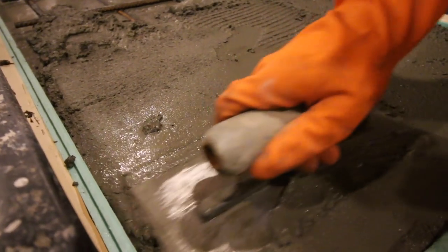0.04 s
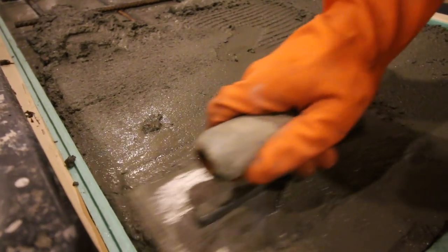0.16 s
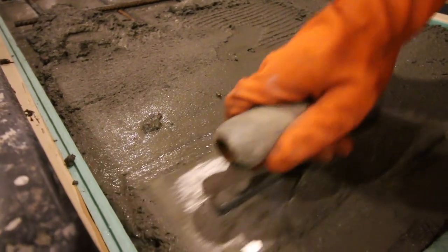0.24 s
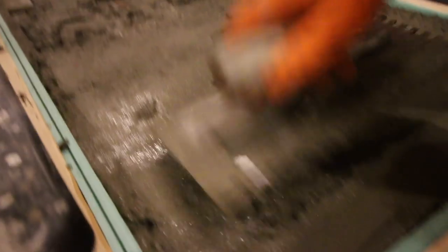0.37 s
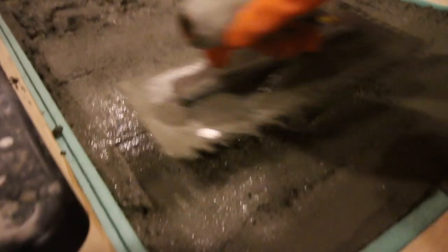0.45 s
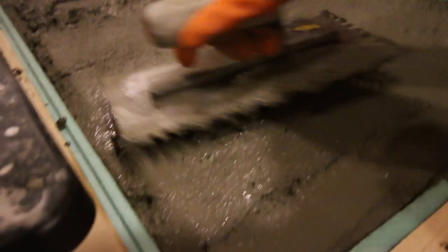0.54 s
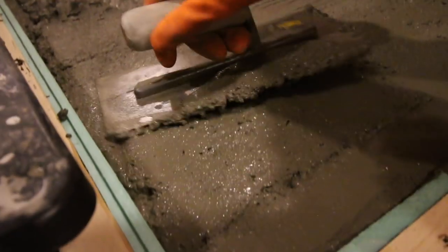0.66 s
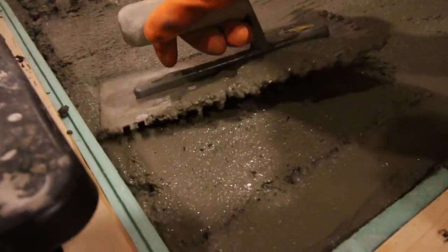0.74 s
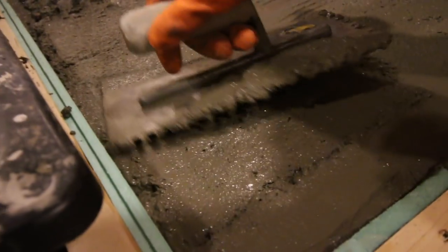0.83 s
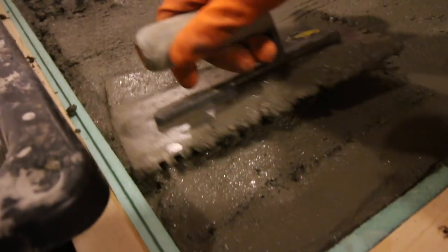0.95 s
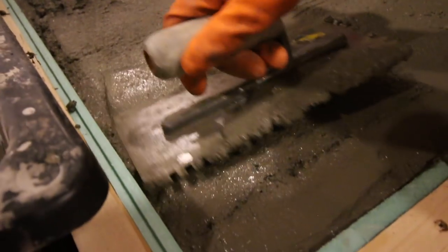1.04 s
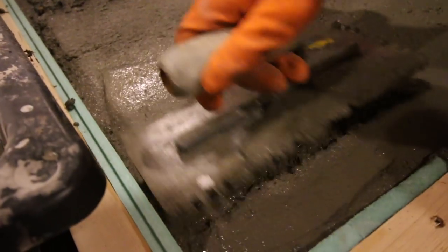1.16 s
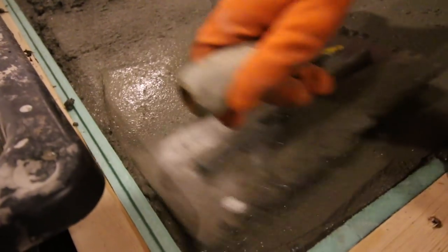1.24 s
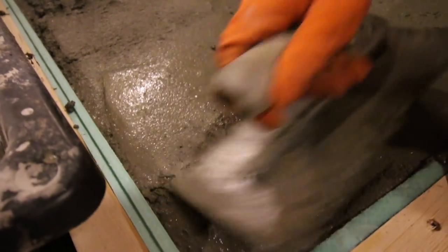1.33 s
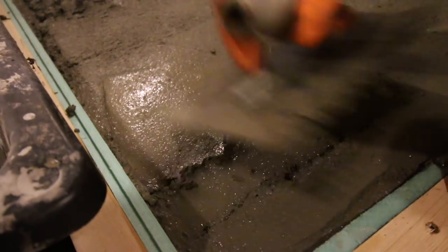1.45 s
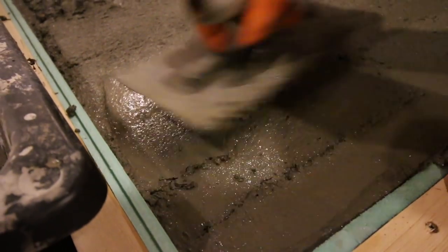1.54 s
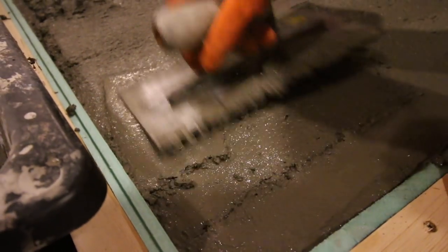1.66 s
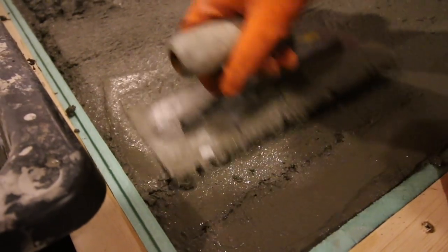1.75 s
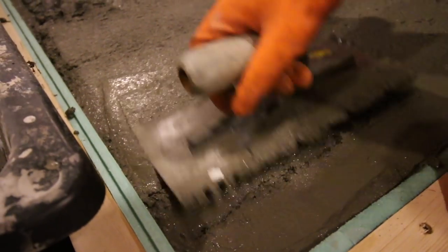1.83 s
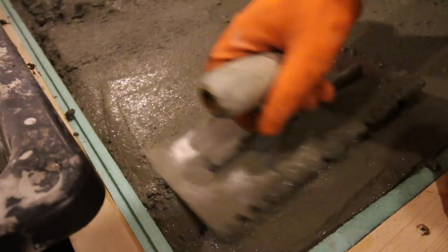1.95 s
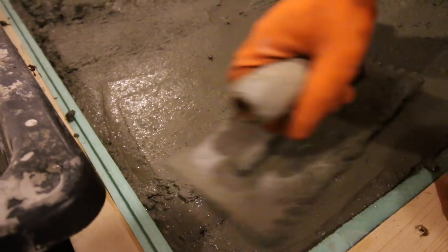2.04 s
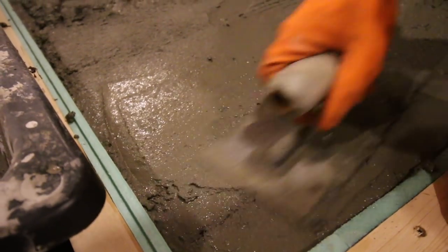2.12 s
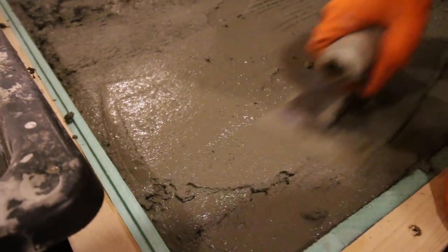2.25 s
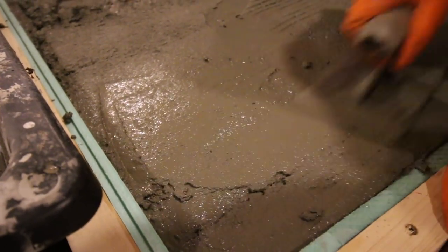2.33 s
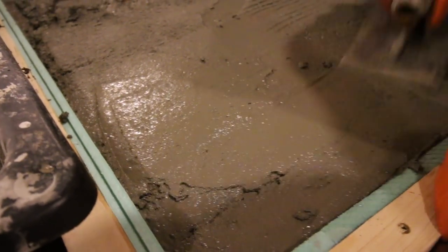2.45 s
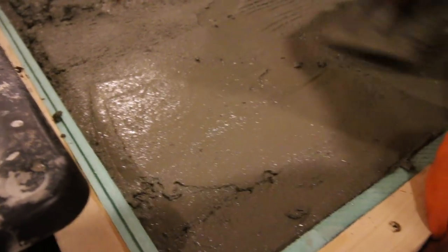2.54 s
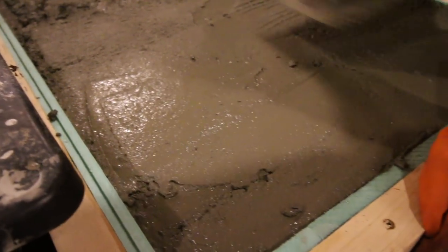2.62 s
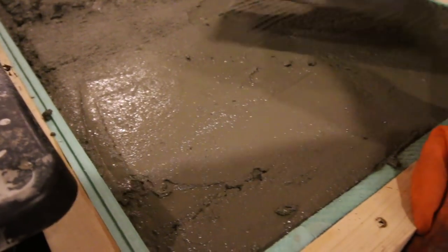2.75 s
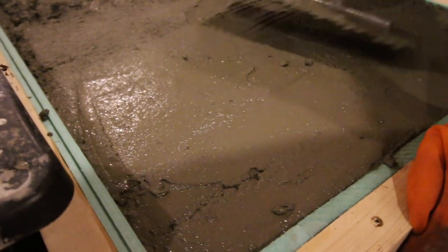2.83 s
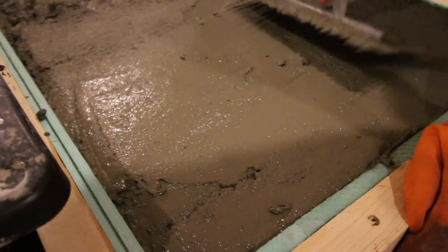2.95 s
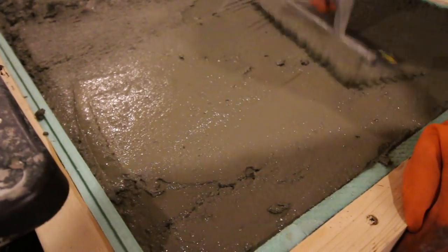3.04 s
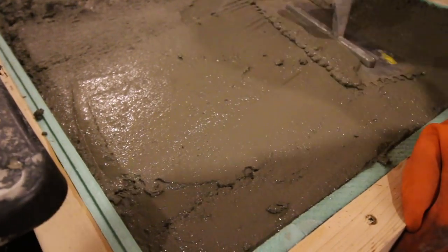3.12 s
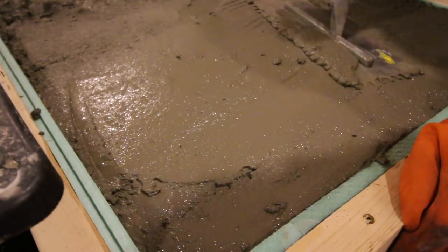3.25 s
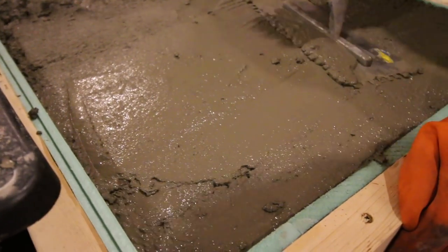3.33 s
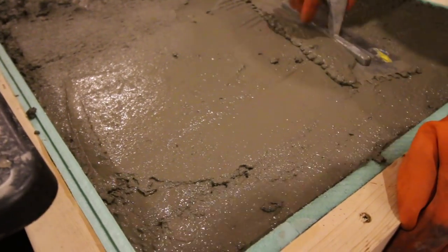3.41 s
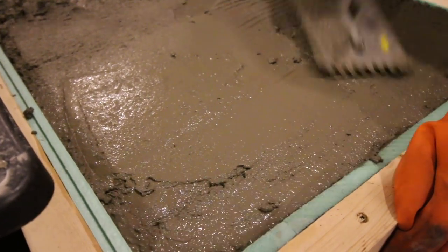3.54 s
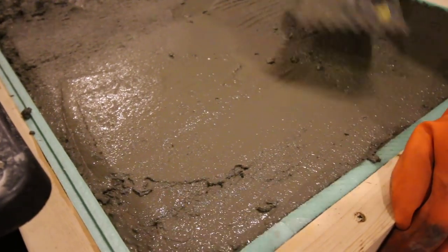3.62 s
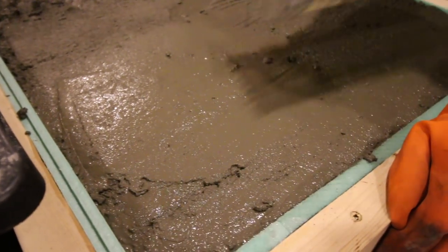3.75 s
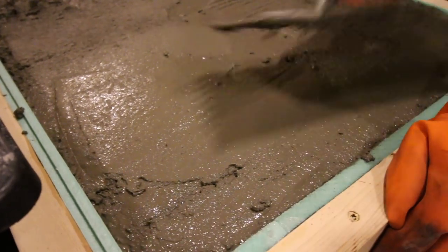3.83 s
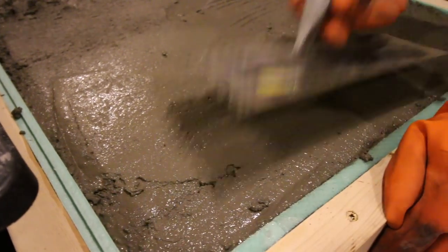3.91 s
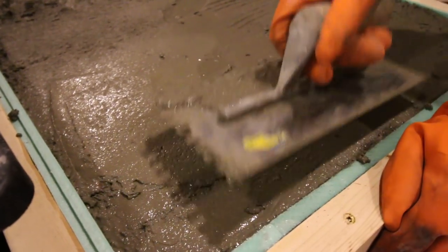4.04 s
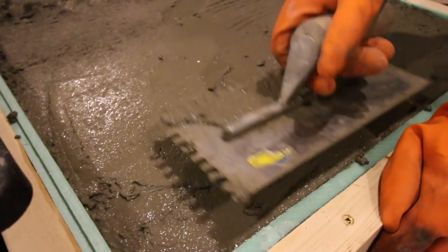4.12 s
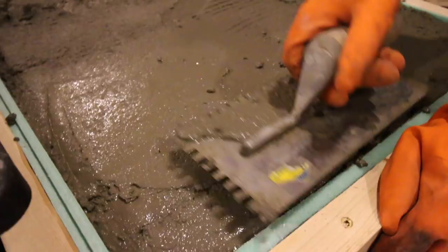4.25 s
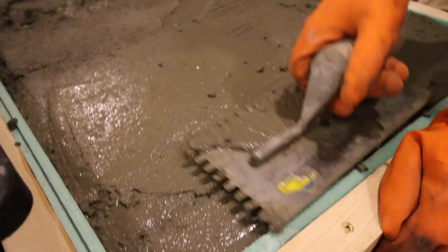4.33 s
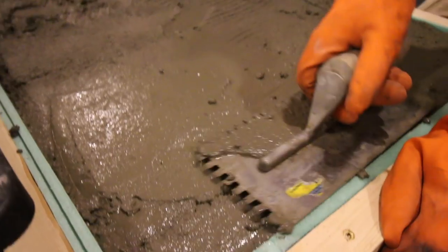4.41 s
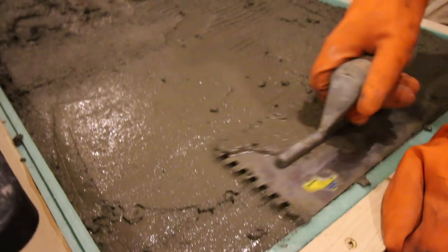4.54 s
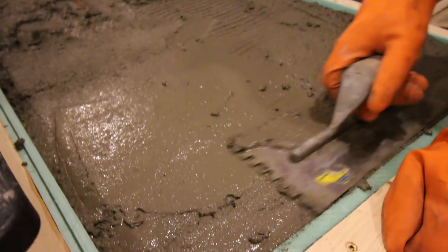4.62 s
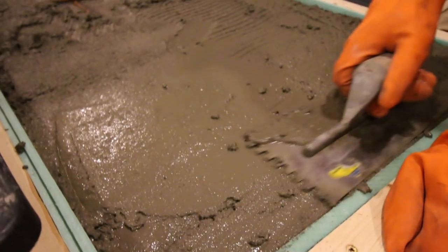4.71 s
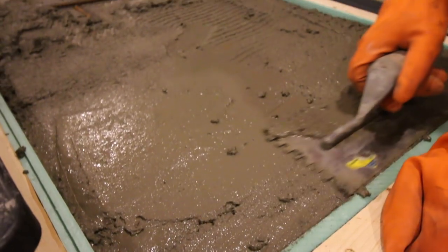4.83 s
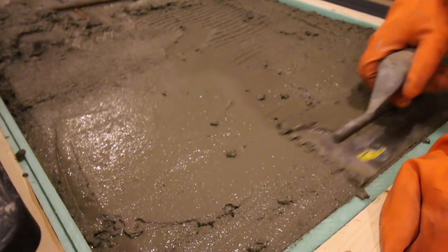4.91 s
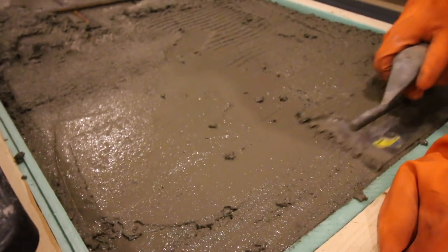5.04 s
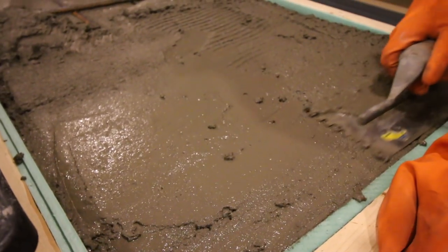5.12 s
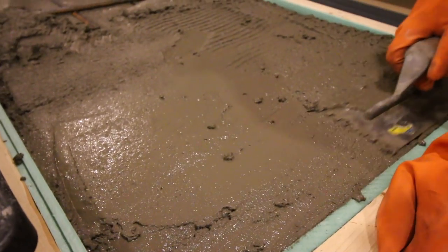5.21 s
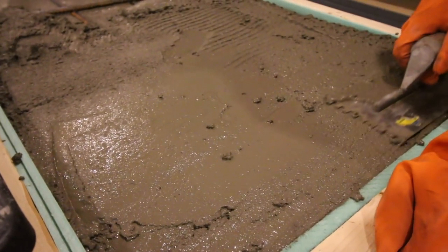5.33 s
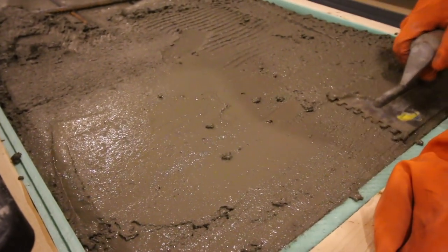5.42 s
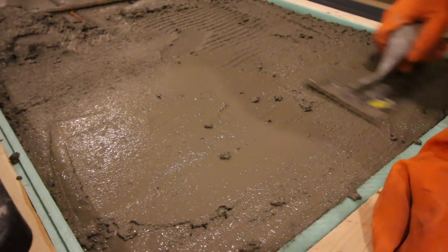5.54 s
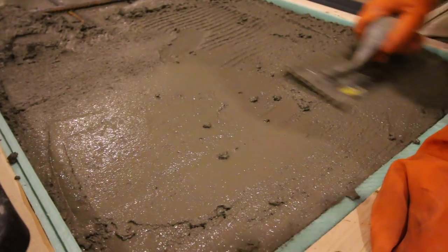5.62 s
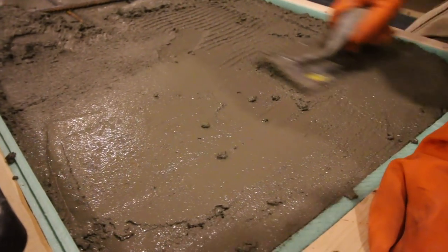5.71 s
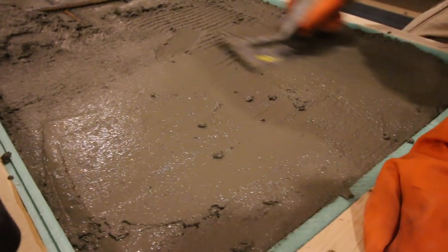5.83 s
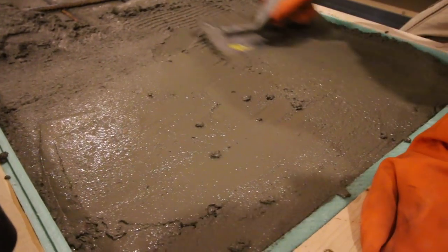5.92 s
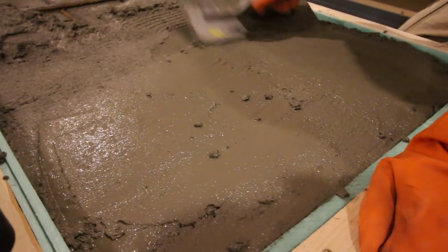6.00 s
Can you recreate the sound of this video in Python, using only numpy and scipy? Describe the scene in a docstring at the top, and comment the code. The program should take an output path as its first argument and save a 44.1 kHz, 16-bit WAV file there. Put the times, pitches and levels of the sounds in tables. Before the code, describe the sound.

Close gritty scraping of a notched trowel on wet concrete: short shoves, sharp stone clicks, quiet pauses, then a loud final sweep.

```python
"""Beside nearby walls, a notched steel trowel works wet concrete in a wooden form, close to the listener.
Short shoves and long sweeps are random sand grains, filtered into a rasp, a wet hiss, a rumble of the form
and a ring of the steel. Resonances add squeaks and low ringing, bursts of noise make clicks, and fading
tones make thuds. Dense echoes answer from the walls, over a low electric hum and a faint rush."""
import sys
import numpy as np
from scipy import signal
from scipy.fft import rfft, irfft
from scipy.io import wavfile
from scipy.ndimage import uniform_filter1d

SR = 44100
rng = np.random.default_rng(int(sys.argv[2]) if len(sys.argv) > 2 else 0)


def file_out(sig):
    """Save sig as 16-bit WAV at sys.argv[1]."""
    # one column per channel
    cols = np.atleast_2d(sig).T
    # limit, then scale
    lim = np.clip(cols, -1, 1)
    pcm = np.round(lim * 32767).astype(np.int16)
    wavfile.write(sys.argv[1], SR, pcm)


N = 267685
TIME = np.arange(N) / SR  # seconds

# spectrum of sand rasping under the blade: (f/Hz, level/dB)
RASP_SPECTRUM = [(50, -64.5), (150, -35.5), (600, -14), (1100, -7), (1750, -1.5), (2250, 2), (2900, 1.5),
                 (3600, 1.5), (4500, -2.5), (6000, -11), (9000, -25), (16000, -48.5)]
# spectrum of the hissing wet film: (f/Hz, level/dB)
HISS_SPECTRUM = [(1000, -48.5), (4000, -2.5), (5200, 3.5), (6300, 0.5), (7700, 4), (9400, 1.5),
                 (11500, -3.5), (15500, -6.5)]
# spectrum of the rumbling wooden form: (f/Hz, level/dB)
FORM_SPECTRUM = [(70, -46), (120, -21.5), (175, 3), (250, -10), (345, 6), (450, -7), (570, -0.5), (740, 7),
                 (900, 0), (1300, -6), (3000, -37)]
# resonances of the steel blade before bending; the widths hold in the mud: (f/Hz, width/Hz, level/dB)
BLADE_MODES = [(1128, 38, 1), (1430, 120, -8), (1581, 89, -0.5), (2074, 41, -2), (2590, 69, -3.5),
               (2940, 22, -21.5), (3480, 47, -32.5), (4300, 330, -13)]

USUAL_DB = -33.5  # rasp level at ordinary hand pressure
BEND = 0.96  # factor on the blade's pitches at ordinary pressure or less
SWEEP_GRIT_DB, SHOVE_GRIT_DB = 2, 4.5  # spread of grain sizes: sweeps ride on fines, shoves dig into coarse grit


def amp(db):
    """Turns decibels into gain."""
    return 10 ** (np.asarray(db) / 20)


def unit(x):
    """Scales a sound to rms 1."""
    return x / np.sqrt(np.mean(x ** 2) + 1e-20)


def read(points, hz):
    """Reads a curve between its points on a log-frequency axis."""
    f, value = np.transpose(points)
    return np.interp(np.log(hz + 1), np.log(f + 1), value)


def add(mix, s, sound):
    """Mixes a sound in at time s in seconds."""
    part = mix[..., max(round(s * SR), 0):][..., :sound.shape[-1]]
    part += sound[..., :part.shape[-1]]


def through(x, response):
    """Passes each row of x through an impulse response."""
    return signal.oaconvolve(x, np.atleast_2d(response), axes=1)[:, :x.shape[1]]


def colour(points, size=4096):
    """Makes a causal filter response of energy 1 with the given spectrum."""
    log_gain = np.log(amp(read(points, abs(np.fft.fftfreq(size, 1 / SR)))))
    minimum_phase = np.exp(np.conj(signal.hilbert(log_gain)))
    response = np.fft.ifft(minimum_phase).real[:size // 2]
    return response / np.linalg.norm(response)


def wander(rate_hz):
    """Makes a slow random curve of rms 1."""
    hz = np.fft.rfftfreq(N, 1 / SR)
    return unit(irfft(rfft(rng.standard_normal(N)) / (1 + (hz / rate_hz) ** 2), N))


def resonate(x, hz, width_hz):
    """A resonance of gain 1 that follows the pitch curve hz and passes no bass."""
    turn = np.exp(2j * np.pi * np.cumsum(hz) / SR)
    r = np.exp(-np.pi * width_hz / SR)
    # shift the pitch down to zero, smooth there, then shift back up
    return (turn * signal.lfilter([1 - r, 1 - r], [1, -r], x / turn)).real


def steady(x):
    """Holds the short-time power of the first row at 1; the other row gets the same gain."""
    return x / np.sqrt(abs(uniform_filter1d(x[0] ** 2, size=800)) + 1e-9)


def scrape():
    """Grains slip under the blade in uneven surges and drive the sand, the water film, the form and the steel."""
    # long smoothing sweeps: (form rumble re rasp level/dB, steel ring re rasp level/dB, hiss centre f/Hz,
    #                         curve of (t/s, rasp level/dB, hiss re rasp level/dB))
    sweep_strokes = [(-12.5, -8, 9800, [(0.775, -48, -4), (0.813, -37.5, -5.5), (0.953, -35, -5),
                     (1.037, -32, -7), (1.069, -35, -5.5), (1.301, -35.5, -7), (1.37, -30.5, -6)]),
                     (-14, -10, 9800, [(1.77, -33, -1.5), (1.808, -41, -1), (1.824, -34, -2),
                     (2.022, -36.5, -8), (2.05, -37, -4.5)]), (-9.5, -2.5, 8600, [(2.06, -32, -10),
                     (2.106, -31.5, -10), (2.144, -32.5, -11), (2.354, -29.5, -6), (2.378, -30, -5.5),
                     (2.504, -30, -4), (2.536, -35, 0), (2.62, -53.5, -7.5)]),
                     (-11, -10.5, 13000, [(4.48, -43, -11), (4.52, -56, 3), (4.536, -56.5, 6),
                     (4.672, -32.5, -5), (4.702, -35, -4), (4.906, -38.5, -8), (5.104, -33, -5),
                     (5.268, -36, -8), (5.51, -40, -4)]), (-16.5, -10, 9800, [(5.52, -36.5, -7.5),
                     (5.77, -22.5, -8), (5.8, -25, -5), (5.908, -23, -9), (5.948, -28, -6),
                     (5.96, -19, -12.5), (6.002, -22, -7.5), (6.06, -29.5, -7), (6.07, -23, -14)])]
    # short shoves and dabs: (start t/s, length t/s, rasp level/dB, then re rasp: hiss level/dB,
    #                         form rumble level/dB, steel ring level/dB)
    shove_strokes = [(0.0, 0.12, -48, -4, 10, 6), (0.141, 0.038, -34, -8.5, 4.5, 0.5),
                     (0.171, 0.028, -27.5, -6.5, 5, -1), (0.255, 0.032, -33, -4, 10, -2),
                     (0.303, 0.019, -36, -7, -1, 0), (0.354, 0.048, -32, -6.5, 4.5, 2.5),
                     (0.388, 0.013, -33.5, 4.5, 3.5, -3), (0.725, 0.025, -46, -4, -22, 2),
                     (1.389, 0.026, -20.5, -17, -8, -2.5), (2.668, 0.086, -56.5, -6.5, 0.5, 0.5),
                     (2.811, 0.076, -54.5, -6.5, -0.5, 2), (3.102, 0.045, -33.5, -7, -14, -1.5),
                     (3.187, 0.1, -57.5, -10, 2.5, 1), (3.343, 0.063, -59, -7, 0, -1),
                     (3.458, 0.054, -57, -10, 6, 5), (3.549, 0.061, -49.5, -3, -0.5, 2.5),
                     (3.67, 0.13, -51.5, -13.5, -5, 1.5), (3.834, 0.079, -59, -9, 0, 7),
                     (3.923, 0.044, -53, -9, -4, -1), (4.014, 0.14, -66.5, -14, 8.5, 6)]
    sweeps = sum(sweep(form, ring, curve) for form, ring, hz, curve in sweep_strokes)
    shoves = sum(shove(*row) for row in shove_strokes)
    sheen_hz = np.full(N, 8200.0)  # centre of the wet hiss outside the sweeps
    for *_, hz, curve in sweep_strokes:
        sheen_hz[(TIME > curve[0][0]) & (TIME < curve[-1][0])] = hz
    rasp_gain, hiss_gain, form_gain, ring_gain = np.sqrt(sweeps + shoves + 1e-12)

    shove_share = shoves[0] / rasp_gain ** 2
    spread_db = SWEEP_GRIT_DB + (SHOVE_GRIT_DB - SWEEP_GRIT_DB) * shove_share
    judder = np.tanh(wander(rate_hz=42))  # coarse grit makes the blade catch and slip
    drag = amp(.4 * spread_db * judder)
    grit = grains(per_s=6000, spread_db=spread_db)
    fines = grains(per_s=17000, spread_db=spread_db)

    # where the edge catches, the rasp narrows into brief, straying squeaks
    rasp = through(grit, colour(RASP_SPECTRUM))
    chatter_hz = 2570 * np.exp(.25 * wander(rate_hz=5))
    chatter = resonate(rasp, chatter_hz, width_hz=110)
    catching = amp(5 * wander(rate_hz=16))
    sand = amp(0.7) * drag * rasp_gain * steady(rasp + amp(-2.5) * catching * chatter)

    fizz = through(0.33 * grit + 1.3 * fines, colour(HISS_SPECTRUM))
    sheen = resonate(fizz, sheen_hz, width_hz=1100)
    film = amp(4.0) * drag * hiss_gain * steady(fizz + 0.31 * sheen)

    stones = grains(per_s=1700, spread_db=spread_db)
    form = amp(-2.5) * through(drag * form_gain * stones, colour(FORM_SPECTRUM))

    # pressing bends the blade and raises its pitches by 0.05 of their table value per dB
    pressure_db = np.maximum(20 * np.log10(rasp_gain) - USUAL_DB, 0)
    bend = (BEND + 0.05 * pressure_db) * np.exp(.012 * wander(rate_hz=7))
    steel_grains = grains(per_s=3000, spread_db=spread_db)
    steel = amp(-1.0) * blade(drag * ring_gain * steel_grains, bend)
    return sand + film + form + steel


def sweep(form_db, ring_db, points):
    """Power of rasp, hiss, rumble and ring in a long sweep: all follow the pressure of the hand."""
    form_slope, ring_slope = -0.16, 0.16  # change re rasp, dB per dB of extra pressure
    s, rasp_db, hiss_db = np.transpose(points)
    rasp_db, hiss_db = np.interp(TIME, s, rasp_db), np.interp(TIME, s, hiss_db)
    pressure_db = rasp_db - USUAL_DB
    # the steel rings up to 5 dB more as it tilts out of the mud at the end
    tilt = np.clip((TIME - s[0]) / (s[-1] - s[0]), 0, 1) ** 5
    rumble_db = form_db + form_slope * pressure_db
    steel_db = ring_db + ring_slope * pressure_db + 5 * tilt
    layers_db = [np.zeros(N), hiss_db, rumble_db, steel_db]
    # a sweep bites and lets go quickly
    touch = contact(s[0], s[-1], attack_db_per_s=2400, release_db_per_s=904)
    return amp(rasp_db + layers_db) ** 2 * touch


def shove(start, length, db, hiss_db, form_db, ring_db):
    """Power of rasp, hiss, rumble and ring in a shove at even pressure: the shorter, the more abrupt."""
    end = start + length
    attack, release = 30 / length, 22.5 / length  # dB per second
    push = contact(start, end, attack, release)
    crumbling = contact(end, end, attack, release_db_per_s=171)  # afterwards the mud goes on crumbling
    power = push + amp(-11) ** 2 * crumbling
    return np.outer(amp(db + np.array([0, hiss_db, form_db, ring_db])) ** 2, power)


def contact(start, end, attack_db_per_s, release_db_per_s):
    """Power envelope of one stroke: attack, hold, release."""
    before, after = np.maximum(start - TIME, 0), np.maximum(TIME - end, 0)
    return amp(-attack_db_per_s * before - release_db_per_s * after) ** 2


def grains(per_s, spread_db):
    """Tiny random slips of sand along the edge, a few of them large; rows: direct and scattered sound."""
    sizes = amp(spread_db * np.minimum(rng.exponential(1, N), 4))
    slips = rng.random(N) < per_s / SR
    return steady(rng.choice([-1, 1], (2, N)) * sizes * slips)


def blade(x, bend):
    """The steel plate: a few resonances that move together as it bends; white noise roughly keeps its power."""
    ring = sum(amp(db) * resonate(x, hz * bend, width) for hz, width, db in BLADE_MODES)
    power = sum(np.pi * width * amp(db) ** 2 for hz, width, db in BLADE_MODES) / SR
    return ring / np.sqrt(power)


def squeaks():
    """Slipping sand drives resonances of the gap and, near 1.1 kHz, of the steel; each swells, fades and sags."""
    # squeaks of the gap under the blade, and low ringing of the steel near 1.1 kHz:
    # (middle t/s, length t/s, middle f/Hz, level/dB)
    squeaks_and_rings = [(1.029, 0.08, 3220, -33), (1.4, 0.024, 2260, -17.5), (1.421, 0.027, 1590, -24.5),
                         (2.115, 0.067, 3470, -29.5), (2.135, 0.15, 2340, -25), (2.284, 0.17, 1010, -33),
                         (2.387, 0.1, 2300, -30), (2.455, 0.07, 1600, -29.5), (4.515, 0.035, 2920, -41),
                         (4.63, 0.29, 2790, -38), (4.63, 0.21, 1190, -44.5), (5.08, 0.12, 1520, -37),
                         (5.21, 0.17, 3450, -41), (5.36, 0.27, 2410, -41), (5.9, 0.2, 2200, -27),
                         (5.922, 0.49, 1090, -26), (5.998, 0.067, 3900, -23)]
    out, grit = np.zeros((2, N)), grains(per_s=6000, spread_db=SWEEP_GRIT_DB)
    for s, length, hz, db in squeaks_and_rings:
        now = abs(TIME - s) < length / 2
        t = TIME[now] - s
        glide = hz * np.exp(-0.28 * t)  # loses 0.28 of its pitch per second
        core = resonate(grit[:, now], glide, width_hz=0.17 * hz)
        note = resonate(core, glide, width_hz=0.28 * hz)
        out[:, now] += amp(db) * np.cos(np.pi * t / length) * unit(note)
    return out


def clicks(size=4096):
    """A stone crumbles under the edge in a few milliseconds, knocks the form and rings the blade."""
    # the blade lands or flicks a stone; levels before shared gains:
    # (t/s, peak level/dB, form knock level/dB, blade ring level/dB)
    stone_clicks = [(0.163, -17, -9, -16), (0.239, -18, -3, -12), (0.259, -14, -25, -9),
                    (0.269, -8, -7.5, -21), (0.359, -12, -2, -27), (0.387, -15, -2, -32),
                    (0.402, -30, -10, -4), (0.494, -27, -24, -29), (0.724, -24, -36, -2),
                    (1.372, -12.5, -18, -20), (1.392, -10, -17, -7), (1.419, -5, -26, -3),
                    (1.769, -21, -34, -13), (2.013, -17.5, -22, -19), (2.061, -36, 0, -4),
                    (3.462, -38, -3, -12.5), (3.994, -33.5, 11.5, 19), (4.51, -29.5, -35, -7),
                    (5.867, -8.5, -37, 25), (5.899, -3, -39, 20), (5.958, -22, -35, 8)]
    out, t = np.zeros((2, N)), np.arange(size) / SR
    rasp, hiss, form = colour(RASP_SPECTRUM), colour(HISS_SPECTRUM), colour(FORM_SPECTRUM)
    noises = rng.standard_normal((len(stone_clicks), 2, size))
    for (s, db, form_db, ring_db), crumbs in zip(stone_clicks, noises):
        blow = (1 - np.exp(-t / 0.000656)) * np.exp(-t / 0.0034) * crumbs
        tick = through(blow, rasp) + amp(-7.0) * through(blow, hiss)
        knock = amp(form_db + 11.5) * through(blow, form)
        steel = amp(ring_db + 4.5) * blade(blow, np.full(size, BEND))
        hit = tick + knock + steel
        add(out, s, amp(db + 1.14) * hit / abs(hit).max())
    return out


def free_rings(size=24000):
    """Clear of the mud, the steel's modes ring out, roughened by the grit; higher ones die sooner."""
    # the blade rings on after a tap or as it springs free; the level adds to each mode's: (t/s, level/dB)
    ring_starts = [(0.725, -62), (1.424, -36.5)]
    out, t = np.zeros((2, N)), np.arange(size) / SR
    noises = rng.standard_normal((len(ring_starts), 2, size))
    for (s, level_db), shiver in zip(ring_starts, noises):
        for hz, width, db in BLADE_MODES:
            t60 = 0.57 * (BLADE_MODES[0][0] / hz) ** 0.6  # seconds to fall by 60 dB
            tone = unit(resonate(shiver, np.full(size, hz * 1.035), width_hz=51))
            add(out, s, amp(level_db + db - 60 * t / t60) * tone)
    return out


def thuds(size=12000):
    """Air pockets give way in the mix: a quickly damped low bump with a dull puff through the form."""
    # soft thuds in the mix and the form, level before the gains of bump and puff:
    # (t/s, level/dB, f/Hz, time to fall by 60 dB t/s)
    soft_thuds = [(0.402, -30, 341, 0.099), (2.06, -31, 772, 0.063), (2.252, -35.5, 168, 0.13),
                  (3.146, -40.5, 150, 0.069), (3.788, -43, 282, 0.058), (5.544, -38.5, 213, 0.073),
                  (5.704, -39.5, 186, 0.046)]
    out, t = np.zeros((2, N)), np.arange(size) / SR
    form = colour(FORM_SPECTRUM)
    noises = rng.standard_normal((len(soft_thuds), 2, size))
    for (s, db, hz, t60), noise in zip(soft_thuds, noises):
        fade = amp(db - 60 * t / t60) * (1 - np.exp(-t / .002))
        bump = amp(9.0) * np.sin(2 * np.pi * hz * t)
        puff = amp(5) * through(noise, form)
        add(out, s, fade * (bump + puff))
    return out


def space(x):
    """The trowel moves between centre and right; boards and hand scatter its treble, the walls answer later."""
    # share of the power that differs between the ears, capped at 0.5 below: (f/Hz, share)
    scatter_share = [(200, 0.002), (600, 0.011), (1200, 0.077), (2200, 0.11), (4200, 0.31), (12000, 0.76)]
    # left minus right ear when the trowel is far right: (f/Hz, level/dB)
    ear_balance = [(300, 0.5), (1200, -2), (2500, -5.5), (4500, -2), (8000, -4), (13000, -8.5)]
    # where the trowel works: (t/s, place from 0 = straight ahead to 1 = far right)
    trowel_path = [(0.0, 0.24), (0.4, 0.31), (0.8, 0.13), (1.35, 0.48), (1.95, 0.21), (2.45, 0.87),
                   (3.7, 0.63), (4.55, 0.81), (5.45, 1.0), (6.0, 0.48)]
    # how long echoes take to fall by 60 dB: (f/Hz, t/s)
    echo_decay = [(150, 0.61), (500, 0.35), (1400, 0.48), (3700, 0.41), (10000, 0.11)]
    hz = np.fft.rfftfreq(N, 1 / SR)
    share = np.clip(read(scatter_share, hz), 0, .5)
    direct, scattered = rfft(x) * np.sqrt([1 - share, share])
    late = np.exp(-2j * np.pi * hz * 3.8e-5)  # the longer way to the left ear, in seconds
    ears = np.array([(direct + scattered) * late, direct - scattered])
    near_share = 0.68  # share of the difference that comes from the nearer ear growing louder
    tilt_db = np.outer([1 - near_share, -near_share], read(ear_balance, hz))
    ahead, far_right = irfft(ears, N), irfft(ears * amp(tilt_db), N)
    place = np.interp(TIME, *np.transpose(trowel_path))
    near = amp(-0.55) * ((1 - place) * ahead + place * far_right)
    # less bass goes into the echoes
    body = signal.sosfilt(signal.butter(1, 700, "high", fs=SR, output="sos"), near)
    return near + amp(-18.5) * through(body, reflections(start_s=.007, t60=echo_decay))


def reflections(start_s, t60, size=20000):
    """Dense echoes of energy 1, different at each ear, each band dying at its own speed."""
    taps = rng.choice([-1., 1.], (2, size)) * (rng.random((2, size)) < .2)
    hz, t, bands = signal.stft(taps, SR, nperseg=128)
    fade = amp(-60 * t / read(t60, hz)[:, None])
    tail = signal.istft(bands * fade, SR)[1]
    tail = np.pad(tail, ((0, 0), (round(start_s * SR), 0)))
    return tail / np.linalg.norm(tail, axis=1, keepdims=True)


def background():
    """Electric hum from steady sine tones, and the faint rush of the room from filtered noise."""
    # tones of the hum: (f/Hz, rms level/dB)
    hum_tones = [(58.7, -59.5), (118.5, -69)]
    # spectrum of the room's rush: (f/Hz, relative level/dB)
    rush_spectrum = [(25, -34.5), (50, -18.5), (100, -4), (170, -6), (260, -3.5), (450, -2), (700, -7),
                     (1500, -9.5), (3000, -14.5), (7000, -19.5), (15800, -26)]
    hum = 0
    for hz, db in hum_tones:
        hum = hum + np.sqrt(2) * amp(db) * np.sin(2 * np.pi * (hz * TIME + rng.random()))
    rush = through(rng.standard_normal((3, N)), colour(rush_spectrum))
    # one rush shared by both ears, plus a separate one for each
    return hum + amp(-59.8) * (rush[0] + 1.19 * rush[1:])


def scene():
    """The trowel between its walls, over the hum and rush."""
    trowel = scrape() + squeaks() + free_rings() + clicks() + thuds()
    return space(trowel) + background()


def record(dry):
    """Cuts the treble above 15950 Hz with a steep low-pass filter."""
    low_pass = signal.firwin(511, 15950, window=("kaiser", 9), fs=SR)
    return signal.oaconvolve(dry, low_pass[None], "same")


dry = scene()
out = record(dry)
file_out(out)
```